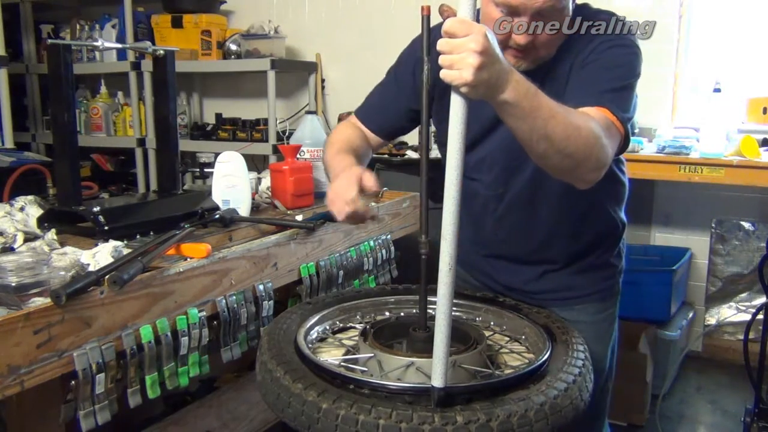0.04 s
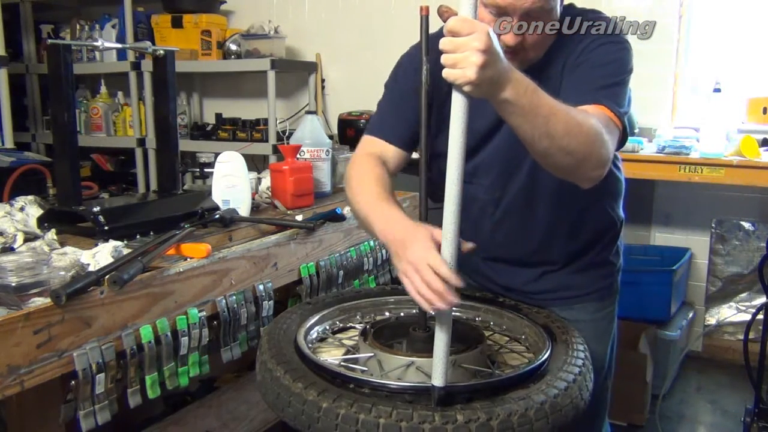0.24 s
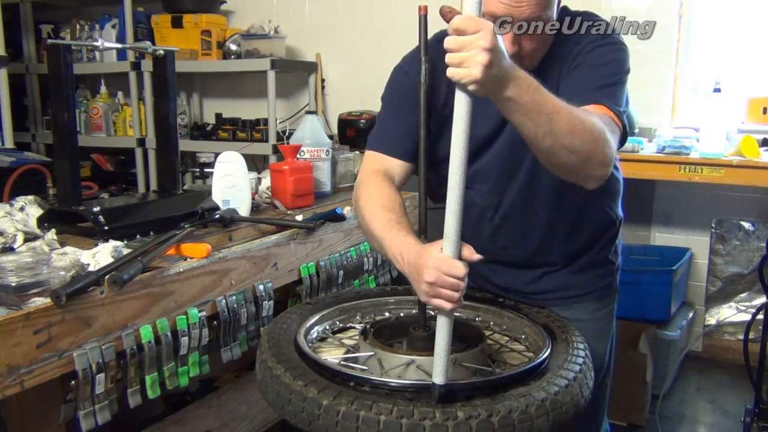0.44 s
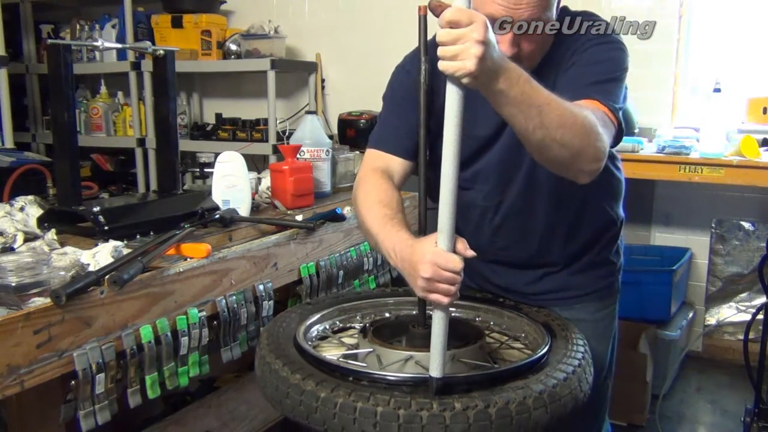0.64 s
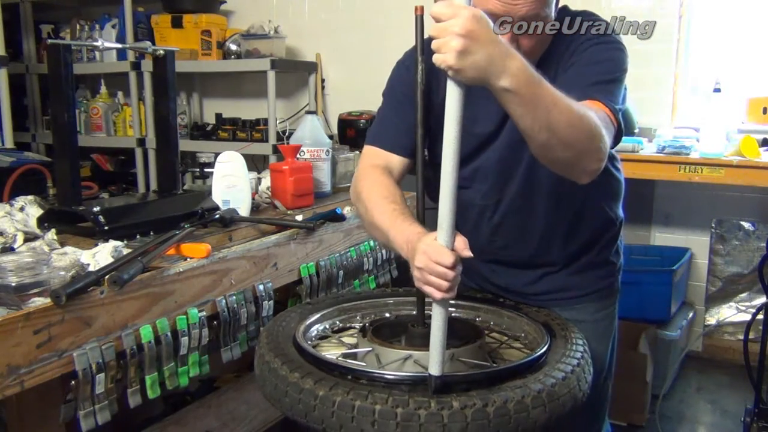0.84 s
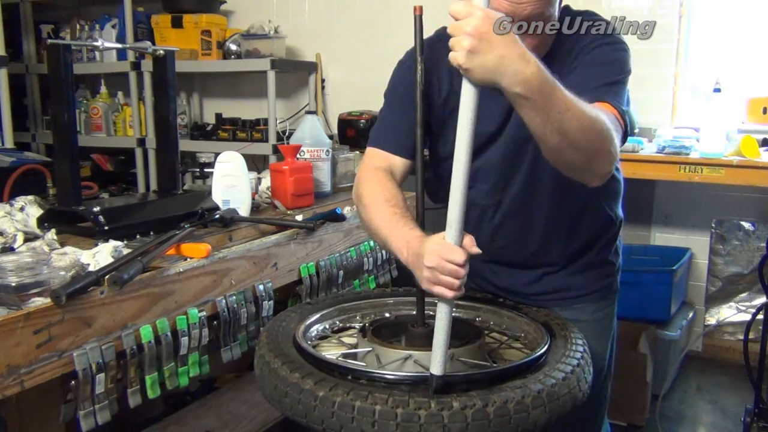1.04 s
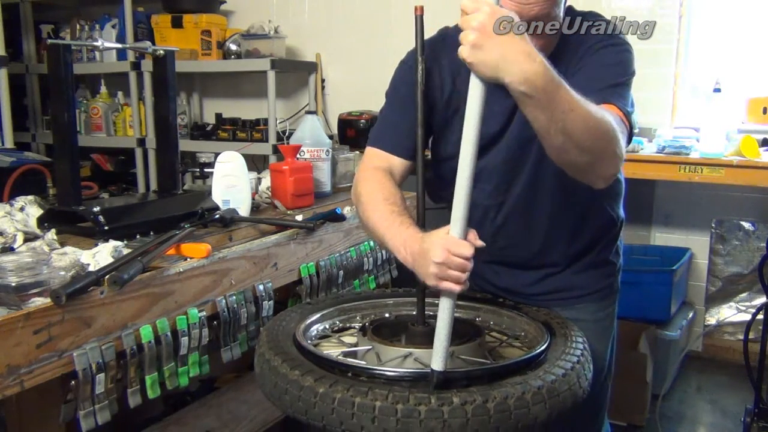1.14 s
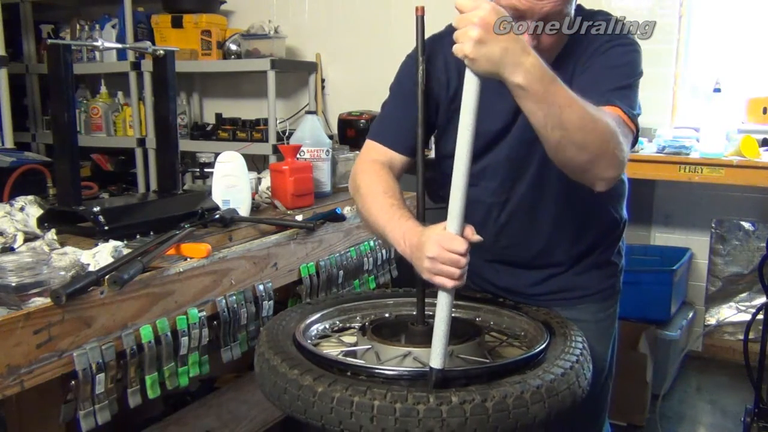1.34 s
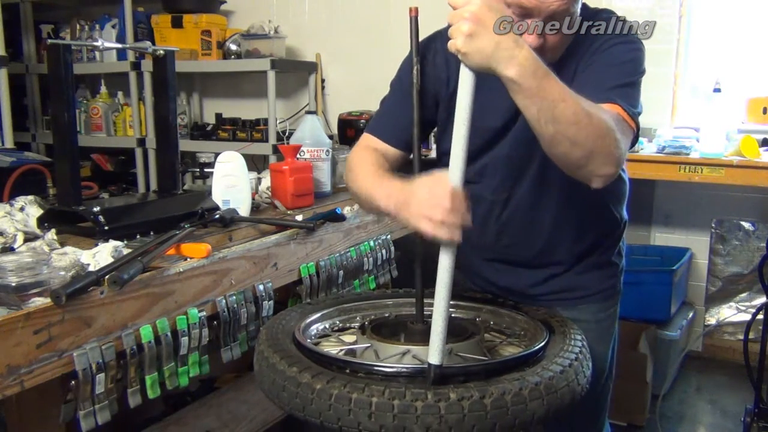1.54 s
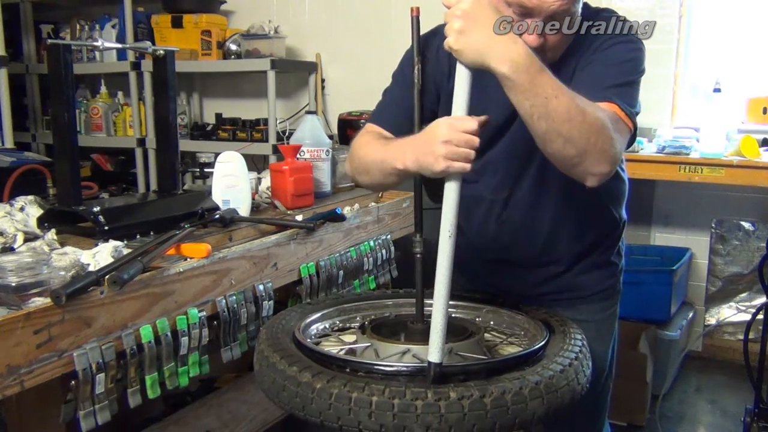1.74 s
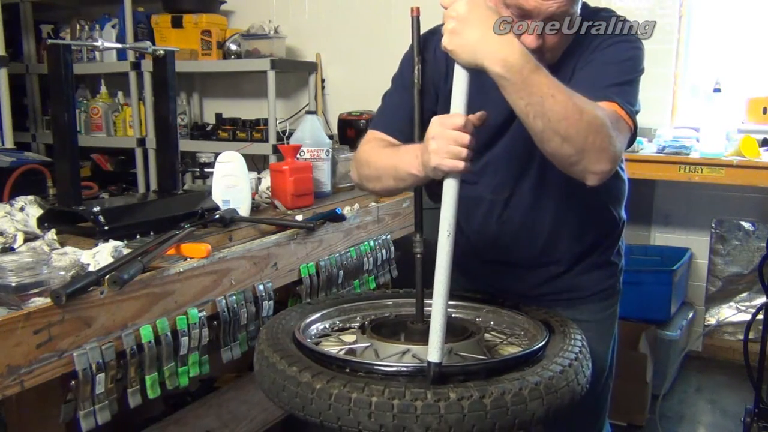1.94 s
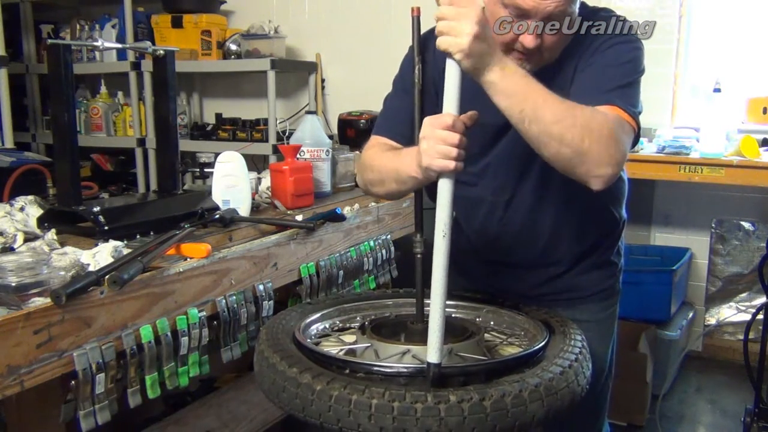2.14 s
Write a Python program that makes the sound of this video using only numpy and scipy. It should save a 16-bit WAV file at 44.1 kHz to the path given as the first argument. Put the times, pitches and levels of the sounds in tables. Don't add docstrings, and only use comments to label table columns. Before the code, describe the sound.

A steel tool bar clanks on a metal stand at 0 s and rattles in some thirty quick, bright contacts until 0.6 s, its high ring fading and damped near 0.9 s. A soft hollow knock comes at 0.8 s, then faint ticks from 1.2 to 1.5 s. Grip ticks and hand rub start around 2.0 s; at 2.14 s rubber and rim crunch and squeal briefly, cut off at the end. Quiet hard-walled shop, faint air, hiss and thin whine.

```python
import sys
import numpy as np
from scipy import signal
from scipy.fft import rfft, irfft, next_fast_len
from scipy.io import wavfile
from scipy.ndimage import uniform_filter1d, map_coordinates

SR = 44100
rng = np.random.default_rng(int(sys.argv[2]) if len(sys.argv) > 2 else 0)


def transcribe(signal):
    frames = np.atleast_2d(signal).T
    limited = np.clip(frames, -1, 1)
    pcm = np.round(limited * 32767).astype(np.int16)
    wavfile.write(sys.argv[1], SR, pcm)


def amplitude_ratio(level_db):
    exponent = np.asarray(level_db, float) / 20
    return 10 ** exponent


N = 96711
LEAD = 4410

# freq_hz, level_db
AIR_COLOUR = [(25, -13.5), (60, -6), (169, -8), (800, -9.5), (2000, -14.5), (4000, -21.5), (15600, -44.5)]
# time_s, level_db
AIR_FADER = [
    (0, -57.5),
    (.55, -65.5),
    (0.699, -65.5),
    (1.152, -67.5),
    (1.301, -66),
    (1.6, -62.5),
    (1.751, -66.5),
    (2.19, -60.5),
]
# freq_hz, likeness_0_to_1
PORT_LIKENESS = [(60, 1), (240, 0.6), (950, 1), (3770, 0.57), (15000, 0.94)]
# freq_hz, level_db
MIC_COLOUR = [(300, -21.5), (1500, -16), (5300, -4.5), (7750, -2), (10400, -9.5), (15600, -14)]
MIC_DB = -69.5
WHINE_HZ, WHINE_DB = 15735, -80

# start_s, level_db, t60_s, brightness_db_per_octave
KNOCK_EVENTS = [
    (-.01, -17, 0.037, 2.5),
    (.012, -22.5, 0.052, -2),
    (.632, -60, 0.057, -8.5),
    (0.781, -50, 0.3, -5.5),
    (1.285, -64.5, 0.32, 0),
    (1.504, -60.5, 0.116, -14.5),
    (2.055, -45.5, 0.041, -16.5),
    (2.129, -47, 0.034, -2),
]
# freq_hz, level_db
KNOCK_COLOUR = [(60, -48), (250, -21), (500, -16.5), (950, -4), (1900, -5), (3000, -9.5), (4200, -17),
                (9000, -50)]

# start_s, click_db, low_db, first_middle_db, second_middle_db
CONTACT_EVENTS = [(0.0014, -28, -26.5, -26, -20), (0.0228, -19.5, -28.5, -14.5, -14.5),
                  (0.034, -23.5, -25, -24, -37.5), (0.0424, -26.5, -25.5, -37, -35.5),
                  (0.054, -34.5, -32, -19.5, -21.5), (0.0636, -36.5, -27.5, -36.0, -35),
                  (0.0785, -22.5, -24.0, -25.5, -22.5), (0.09, -31.5, -31, -22.5, -17.5),
                  (0.0986, -34.0, -40.5, -22.5, -15.5), (0.111, -37.0, -25, -26.5, -21),
                  (0.119, -36.0, -20.5, -20.5, -26.5), (0.1324, -27, -27.5, -16, -20.5),
                  (0.1594, -32.5, -21, -18, -23), (0.1894, -33.5, -22.5, -20.5, -21.5),
                  (0.2144, -35.5, -24.5, -29, -21), (0.2444, -38.5, -32, -32, -16.5),
                  (0.2632, -15, -49.5, -25.5, -23), (0.2844, -27.5, -37.5, -27.0, -23.5),
                  (0.3174, -28.5, -38.5, -22.5, -17.5), (0.3424, -29, -35.0, -37.5, -21),
                  (0.3694, -28, -42, -26.5, -15.5), (0.399, -18, -43, -32, -17),
                  (0.4194, -18.5, -38.0, -31.5, -20), (0.4584, -28, -47, -27, -32.5),
                  (0.4728, -31.5, -62.5, -28.5, -34), (0.503, -24.5, -36, -39.5, -36.5),
                  (0.5124, -25, -54.5, -26, -30.0), (0.53, -27.5, -49, -41, -28.5),
                  (0.5524, -28, -47.5, -37, -40), (0.5924, -35.0, -52.5, -36.5, -31.0)]
# bright_db, lower_side_db, upper_side_db, thin_db, topmost_db
CONTACT_OVERTONES = [(-26.5, -32.5, -36.5, -61.5, -66.5), (-38, -30.5, -36.5, -42.5, -53.5),
                     (-14, -31.5, -43.5, -44, -53), (-32.5, -41.0, -25.5, -39.5, -51.5),
                     (-29.5, -35.5, -40.5, -52.0, -45), (-13, -43, -37, -45.5, -51.5),
                     (-23.5, -36.5, -43.5, -49.5, -47.5), (-26.0, -45.5, -39, -48, -60),
                     (-37.5, -45, -49, -53.0, -61.0), (-14.5, -38, -46.5, -48.0, -63.0),
                     (-15, -32.5, -45.5, -50.0, -54), (-23, -32.5, -42.5, -37, -54),
                     (-21.0, -38, -39, -34.5, -60), (-17.5, -37, -38, -45.5, -52.5),
                     (-16, -43.0, -38.5, -45.5, -50.5), (-32, -47.5, -47.5, -43.5, -58.5),
                     (-18.5, -47.5, -36, -48, -55.5), (-15.5, -52, -50, -53.5, -53),
                     (-29, -49, -36, -38.0, -47), (-23, -42, -37.5, -41.5, -48),
                     (-24.0, -44.5, -42, -45.5, -45.5), (-23, -43, -41, -43.0, -50.5),
                     (-21, -45.0, -42, -35, -55), (-16.0, -57, -47.5, -41.0, -56.5),
                     (-13, -52, -34.5, -48.5, -56.0), (-19.0, -47.5, -33.5, -44, -53.5),
                     (-21.5, -48.5, -34.5, -43.5, -53.0), (-18.5, -51, -41, -54, -50),
                     (-24.5, -49, -33.5, -46.5, -49), (-29, -53.5, -40, -55.5, -58)]
# pitch_hz, family_index (which ringing level above drives it, low = 0)
BAR_MODES = [(1105, 0), (2269, 4), (2818, 0), (4424, 5), (5426, 1), (5907, 2), (480, 4), (9035, 3),
             (10029, 5), (10574, 5), (12908, 6), (14972, 7), (15245, 7)]
# level_db over the family, t60_s, left_over_right_db, port_drift_0_to_1
MODE_RING = [(-20, 0.1, -2.5, .05), (-3.5, 0.98, -3.5, 0), (-3, 0.4, -2, .06), (-7.5, 0.45, -1, .12),
             (-2, .42, -2, 0.3), (-0.5, .5, -1, .4), (-28.5, 0.26, -5, 0.1), (0, 0.33, -0.4, .2),
             (-8.5, 0.2, -3.2, .2), (-0.5, 0.47, 0.6, .15), (2, .26, 0.5, 0.5), (-5, .25, 2.5, .15),
             (1.5, .25, 0.5, .15)]
SWELL_S, DRIFT_HZ, RING_DB = .007, 14, 3
FUZZ, FUZZ_HZ = .3, 130
PHASE_JUMP_RAD = .9
GRIP_S, GRIP_T60_S, GRIP_BELOW_HZ = 0.88, .03, 2500
# freq_hz, level_db
CLICK_COLOUR = [(150, -58.5), (500, -29), (3500, -20), (5500, -2.5), (7500, -2.5), (9000, 8.5),
                (10800, -10), (11500, -28), (16000, -52)]
CLICK_T60_S, CLICK_DB, CLICK_GROWS = .11, -8.5, 1.1
CHATTER_DB, CHATTER_PER_S = -3, 1400

# start_s, level_db, t60_s
THUD_EVENTS = [
    (.785, -54, .05),
    (.792, -51.5, .12),
]
# freq_hz, level_db
HOLLOW_COLOUR = [(500, -33), (760, -6), (930, 8.5), (1150, 1), (1600, -15), (2200, -34)]

# start_s, level_db
TICK_EVENTS = [
    (1.232, -61.5),
    (1.378, -54.5),
    (1.447, -65.5),
    (2.0116, -47),
    (2.0165, -59),
    (2.076, -56.5),
    (2.098, -58),
    (2.129, -60),
]
# time_s, level_db
RUB_FADER = [
    (1.96, -66.5),
    (2.01, -66),
    (2.04, -67.5),
    (2.10, -63),
    (2.14, -66),
]
# freq_hz, level_db
TICK_COLOUR = [(1500, -23), (4500, -10), (6000, -12), (7800, -3.5), (9500, -13), (11500, -35)]
TICK_T60_S = 0.019

# start_s, push_db, snap_db, direction_sign
CRUNCH_EVENTS = [(2.1397, -9.5, -16, -1), (2.1403, -6, -19, 1), (2.142, -9, -44.5, 1),
                 (2.148, -10.5, -29.5, 1), (2.1522, -11, -43.5, 1), (2.155, -10.5, -34.5, 1),
                 (2.1639, -19, -16.5, 1), (2.1664, -14, -29, -1), (2.1686, -13.5, -28, 1),
                 (2.1699, -13.5, -28, -1), (2.172, -6.5, -26, 1), (2.1745, -16.5, -28, 1),
                 (2.1772, -4, -37.5, 1), (2.1806, -11.5, -34.5, 1), (2.1826, -9.5, -46.5, 1),
                 (2.1864, -6, -40, 1), (2.1884, -8.5, -45, 1), (2.1907, -7, -39.5, 1)]
# pitch_hz, width_hz, level_db
TYRE_MODES = [(172.5, 54, -1), (394, 82, 3.5), (537, 230, 4), (955, 210, 2), (1770, 290, -18),
              (2400, 600, -20)]
PUSH_HZ, PUSH_DB = 3450, 17.5
# freq_hz, level_db
SNAP_COLOUR = [(1500, -37.5), (3000, -22.5), (4300, -15), (6500, -8.5), (8000, -0.5), (10500, -17.5),
               (13500, -37.5), (14500, -76)]
SNAP_DB, SNAP_T60_S = -1.5, 0.0073
# time_s, level_db
SLIP_FADER = [
    (2.139, -54.5),
    (2.141, -25),
    (2.16, -22),
    (2.175, -19),
    (2.193, -21.5),
]
# freq_hz, level_db
DRAG_COLOUR = [(30, -29.5), (60, -12), (372, 2), (968, -6), (2200, -11.5), (4320, -25), (7970, -22),
               (14500, -71)]
# time_s, level_db
SQUEAL_FADER = [
    (2.152, -49.5),
    (2.168, -19.5),
    (2.193, -37.5),
]
# freq_hz, level_db
RIM_COLOUR = [(900, -37), (1900, 2), (2600, -11), (4200, -39.5)]
BUMP_DB = -38.5

# freq_hz, t60_s
WALL_DECAY = [(200, 0.13), (1500, 0.44), (6000, 0.53), (12000, 0.39)]
WET_DB, WIDTH = -4, .38
RING_WET_DB, RING_SIDE_DB = -24, -26
# start_s, end_s, below_hz, lost_share
STARVED_BASS = [
    (.085, .23, 190, .995),
    (.23, .5, 345, .995),
    (.5, .575, 120, .995),
    (.575, .95, 220, .45),
]


def unit(x):
    return x / np.sqrt(np.mean(x ** 2) + 1e-20)


def along(points, hz):
    f, v = np.transpose(points)
    return np.interp(np.log(hz + 1), np.log(f + 1), v)


def clock():
    return (np.arange(N + LEAD) - LEAD) / SR


def filtered(x, response):
    m = next_fast_len(x.shape[-1] + 8192)
    return irfft(rfft(x, m) * response(np.fft.rfftfreq(m, 1 / SR)), m)[..., :x.shape[-1]]


def hiss(spectrum, channels=1):
    white = rng.standard_normal((channels, N + LEAD))
    return unit(filtered(white, lambda hz: amplitude_ratio(along(spectrum, hz))))


def wobble(rate):
    return map_coordinates(rng.standard_normal(400), [np.arange(N + LEAD) * rate / SR])


def dying(s, db, t60):
    t = clock() - s
    return (t >= 0) * amplitude_ratio(db - 60 * np.abs(t) / t60)


def fader(rows):
    s, db = np.transpose(rows)
    return amplitude_ratio(np.interp(clock(), s, db, left=-120))


def gated(envelope, spectrum, tilt_db=0, source=None):
    def gain(hz):
        return amplitude_ratio(along(spectrum, hz) + tilt_db * np.log2((hz + 50) / 1000))
    if source is None:
        source = rng.standard_normal(N + LEAD)
    return filtered(envelope * source, gain) / np.sqrt(np.mean(gain(np.arange(SR // 2)) ** 2))


def air():
    def split(x):
        def shares(hz):
            turn = np.arccos(np.clip(along(PORT_LIKENESS, hz), -1, 1)) / 2
            return np.array([np.cos(turn), np.sin(turn)])
        return filtered(x, shares)

    gusts = fader([(-1, -70)] + AIR_FADER) * amplitude_ratio(0.45 * wobble(1.9))
    draught = gusts * split(hiss(AIR_COLOUR, channels=2))
    mid, side = draught + amplitude_ratio(MIC_DB) * split(hiss(MIC_COLOUR, channels=2))
    whine = amplitude_ratio(WHINE_DB + 3) * np.sin(2 * np.pi * WHINE_HZ * clock())
    return np.array([mid + side, mid - side]) + whine


def knocks():
    dull = 0
    for s, db, t60, tilt in KNOCK_EVENTS:
        blow = uniform_filter1d(dying(s, db, t60), size=300)
        dull = dull + gated(blow, KNOCK_COLOUR, tilt)
    return dull


def bar_ring():
    t, contacts = clock(), np.array(CONTACT_EVENTS)
    last = np.clip(np.searchsorted(contacts[:, 0], t) - 1, 0, None)
    since = np.maximum(t - contacts[last, 0], 0)
    keep = np.exp(-1 / (SWELL_S * SR))
    levels = np.hstack([contacts[:, 2:], CONTACT_OVERTONES])
    ring = 0
    for (hz, family), (db, t60, pan_db, drift) in zip(BAR_MODES, MODE_RING):
        grip_db = 60 * np.maximum(t - GRIP_S, 0) / GRIP_T60_S * (hz < GRIP_BELOW_HZ)
        jumps = np.exp(1j * np.cumsum(PHASE_JUMP_RAD * rng.standard_normal(len(contacts))))
        level = amplitude_ratio(levels[last, int(family)] + db - 60 * since / t60 - grip_db) * jumps[last]
        swell = signal.lfilter([1 - keep], [1, -keep], level)
        swell = swell * (1 + FUZZ * (wobble(FUZZ_HZ) + 1j * wobble(FUZZ_HZ)))
        tone = swell * np.exp(2j * np.pi * hz * t)
        apart = np.real(tone * drift * (wobble(DRIFT_HZ) + 1j * wobble(DRIFT_HZ)))
        pan = amplitude_ratio([[pan_db / 2], [-pan_db / 2]])
        ring = ring + pan * np.array([tone.real + apart, tone.real - apart])
    return amplitude_ratio(RING_DB) * ring


def bar_clicks():
    contacts = np.array(CONTACT_EVENTS)
    top = contacts[:, 1].max()
    burst = 0
    for s, db in contacts[:, :2]:
        burst = burst + dying(s, top + CLICK_GROWS * (db - top) + CLICK_DB, CLICK_T60_S)
    burst = uniform_filter1d(burst, size=220)
    hits = rng.random(N + LEAD) < CHATTER_PER_S / SR
    grit = unit(hits * rng.standard_normal(N + LEAD))
    return gated(burst, CLICK_COLOUR, source=grit) + amplitude_ratio(CHATTER_DB) * gated(burst, CLICK_COLOUR)


def stand_thud():
    blows = sum(dying(*row) for row in THUD_EVENTS)
    return gated(uniform_filter1d(blows, size=150), HOLLOW_COLOUR)


def grip_ticks():
    ticks = sum(dying(s, db, TICK_T60_S) for s, db in TICK_EVENTS)
    return gated(ticks + fader(RUB_FADER), TICK_COLOUR)


def crunch():
    pushes, snaps = np.zeros(N + LEAD), 0
    for s, db, snap_db, way in CRUNCH_EVENTS:
        pushes[LEAD + round(s * SR)] = np.sign(way) * amplitude_ratio(db + PUSH_DB)
        snaps = snaps + dying(s, snap_db + SNAP_DB, SNAP_T60_S)

    def tyre(f):
        modes = sum(amplitude_ratio(db) * 1j * f * w / (c * c - f * f + 1j * f * w) for c, w, db in TYRE_MODES)
        return modes * np.exp(-(f / PUSH_HZ) ** 2)

    drag = gated(fader(SLIP_FADER), DRAG_COLOUR)
    squeal = gated(fader(SQUEAL_FADER), RIM_COLOUR)
    return filtered(pushes, tyre) + gated(snaps, SNAP_COLOUR) + drag + squeal


def bump():
    shake = amplitude_ratio(BUMP_DB) * (clock() > CRUNCH_EVENTS[0][0])
    rumble = gated(shake, [(30, -20), (61.3, 0), (130, -30), (300, -120)])
    return rumble * np.array([[.2], [1]])


def shop(x, width):
    hz, t, z = signal.stft(rng.standard_normal((2, SR // 2)), SR, nperseg=256)
    fall = amplitude_ratio(-60 * t / along(WALL_DECAY, hz)[:, None])
    tail = signal.istft(z * fall, SR, nperseg=256)[1]
    late = np.pad(x, (300, 0))[None]
    mid, side = signal.fftconvolve(late, tail / np.linalg.norm(tail[0]), axes=1)[:, :len(x)]
    return np.array([mid + width * side, mid - width * side])


def scene():
    background = air()
    dull = knocks()
    ring = bar_ring()
    rest = dull + bar_clicks() + stand_thud() + grip_ticks() + crunch()
    near = ring + rest * amplitude_ratio([[.3], [-.3]])
    ring_walls = amplitude_ratio(RING_WET_DB) * shop(ring.mean(axis=0), amplitude_ratio(RING_SIDE_DB - RING_WET_DB))
    walls = ring_walls + amplitude_ratio(WET_DB) * shop(rest, WIDTH)
    return (near + walls + background + bump())[:, LEAD:]


def roll_off(x):
    return signal.sosfilt(signal.butter(12, 15820, fs=SR, output="sos"), x)


def record(dry):
    t = np.arange(N) / SR
    lost = 0
    for start, end, edge_hz, share in STARVED_BASS:
        span = uniform_filter1d(1. * ((t > start) & (t <= end)), size=700)
        bass = filtered(dry, lambda hz: 1 / (1 + (hz / edge_hz) ** 12))
        lost = lost + share * span * bass
    return roll_off(dry - lost)


dry = scene()
out = record(dry)
transcribe(out)
```